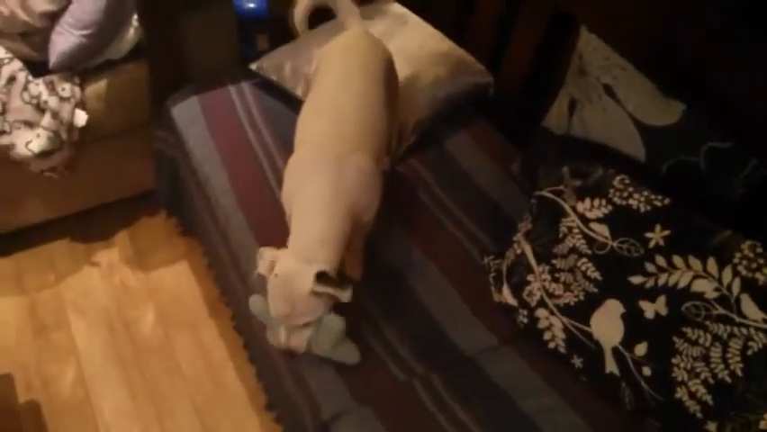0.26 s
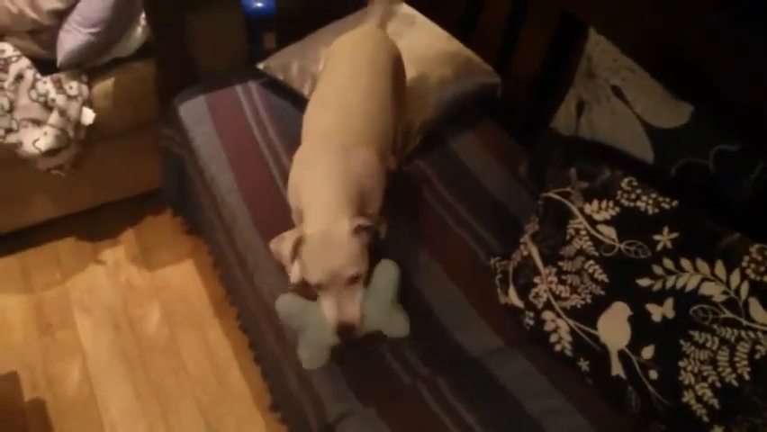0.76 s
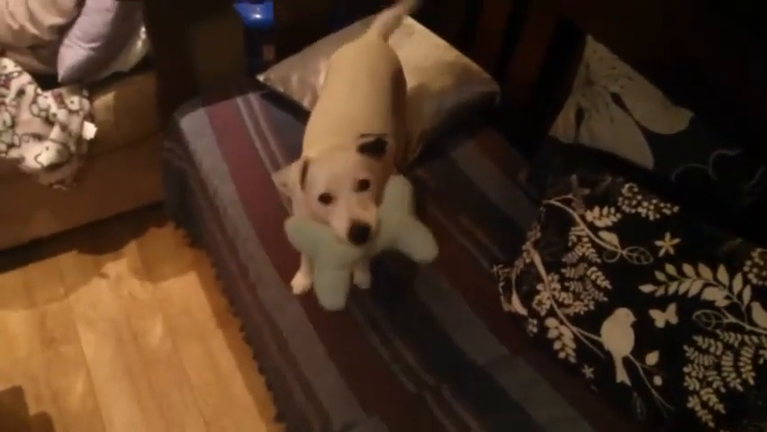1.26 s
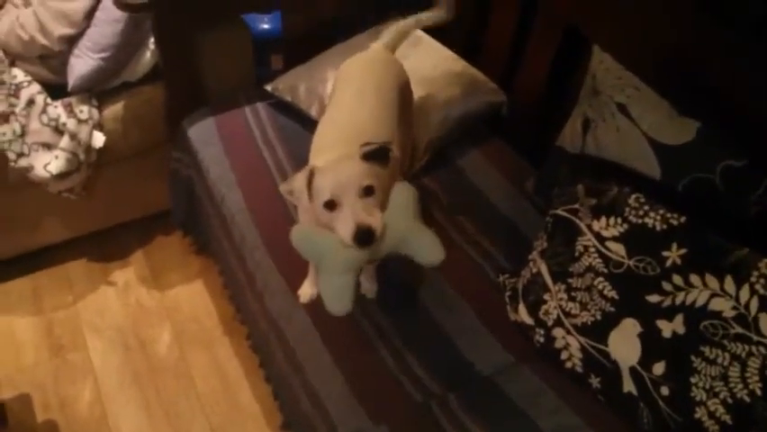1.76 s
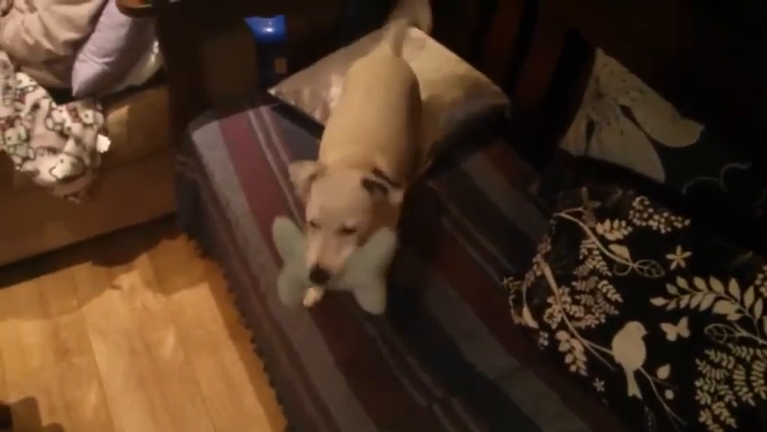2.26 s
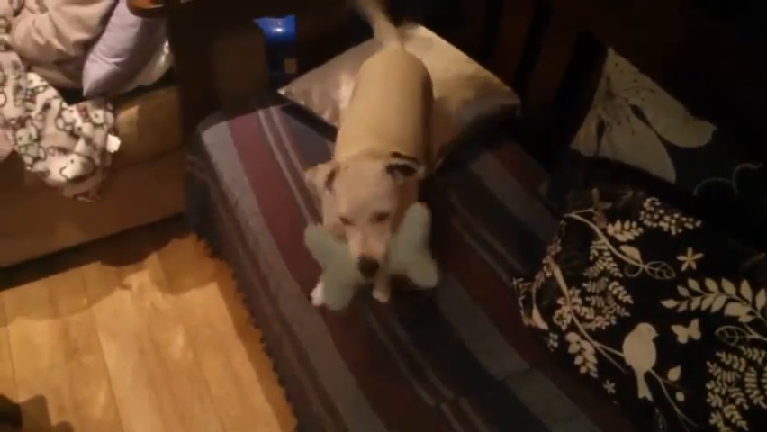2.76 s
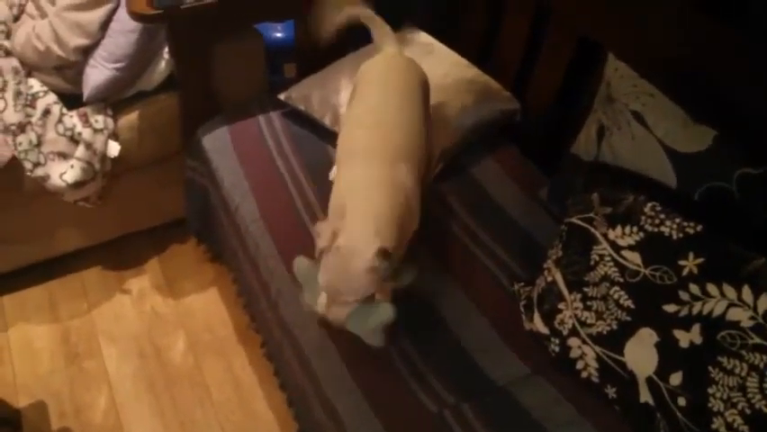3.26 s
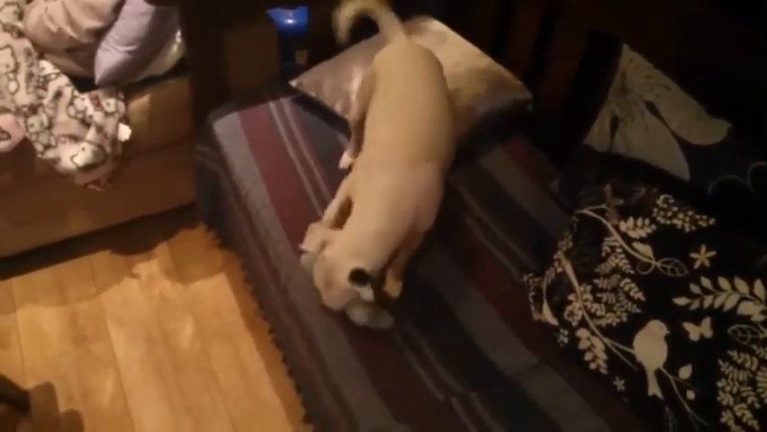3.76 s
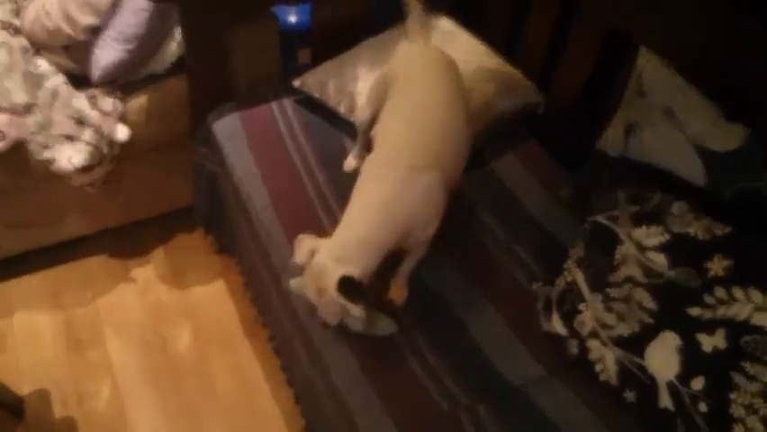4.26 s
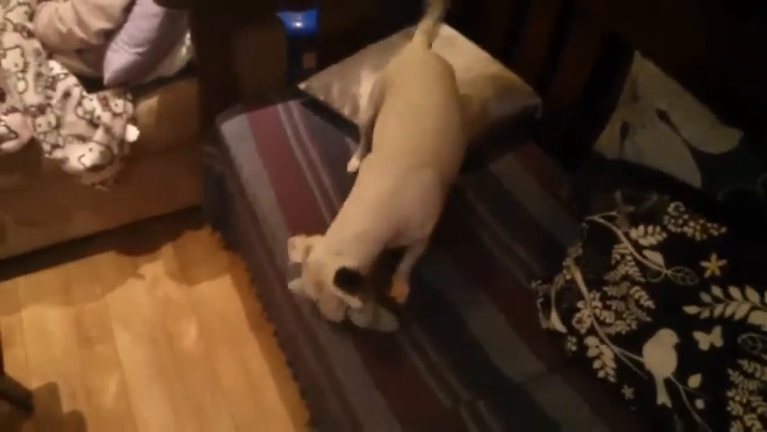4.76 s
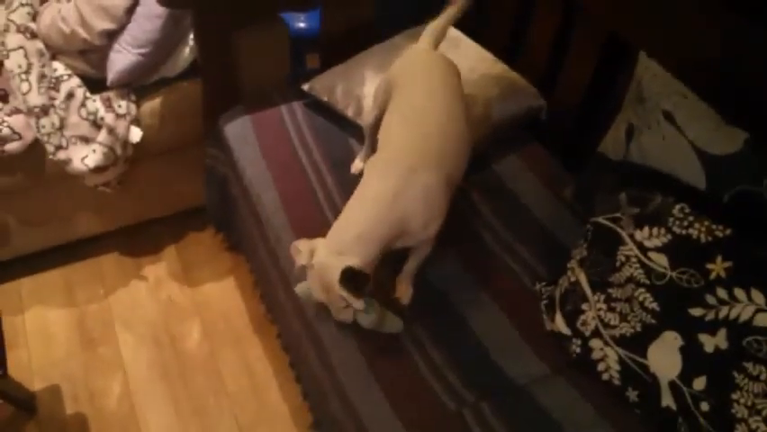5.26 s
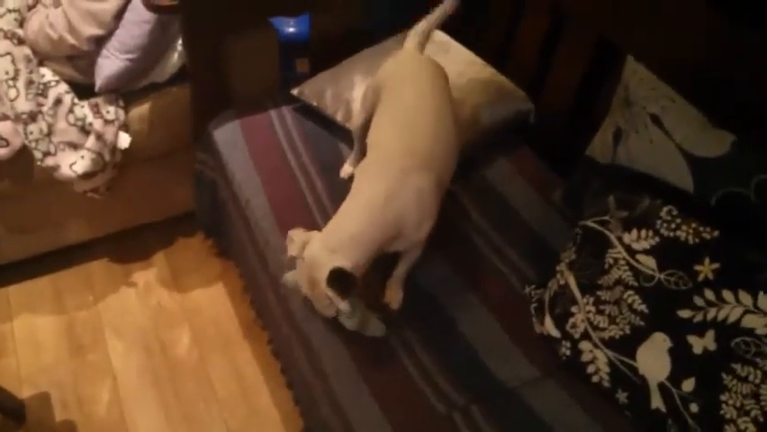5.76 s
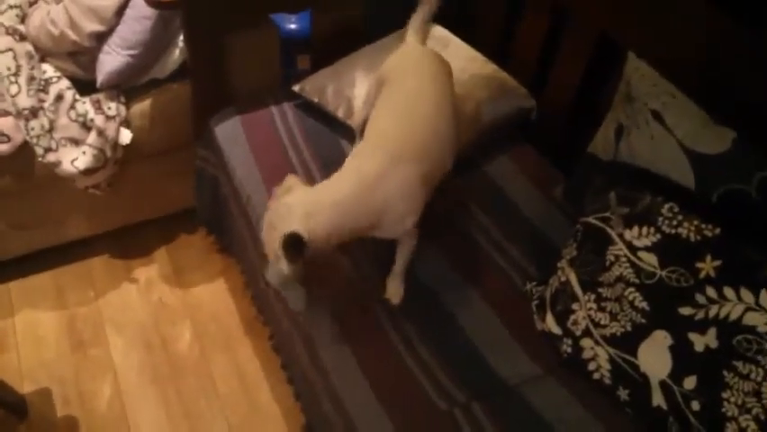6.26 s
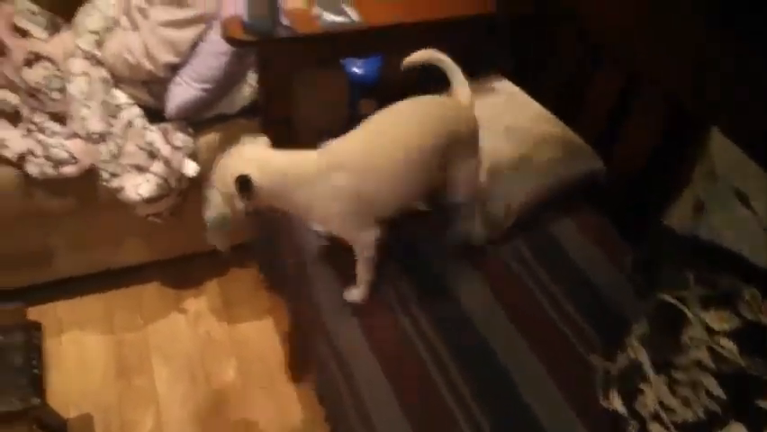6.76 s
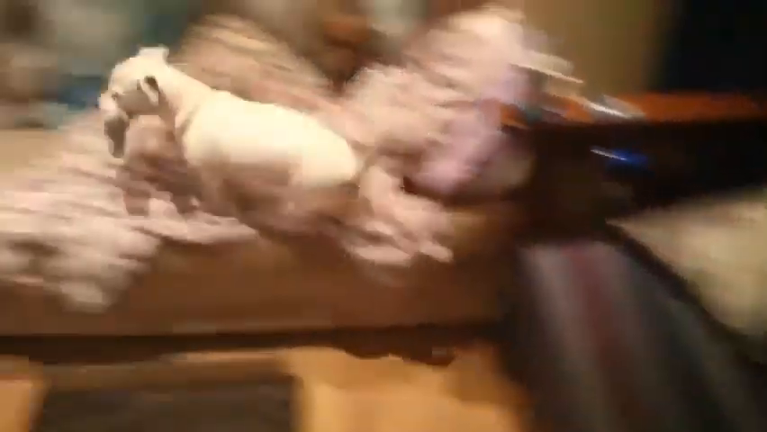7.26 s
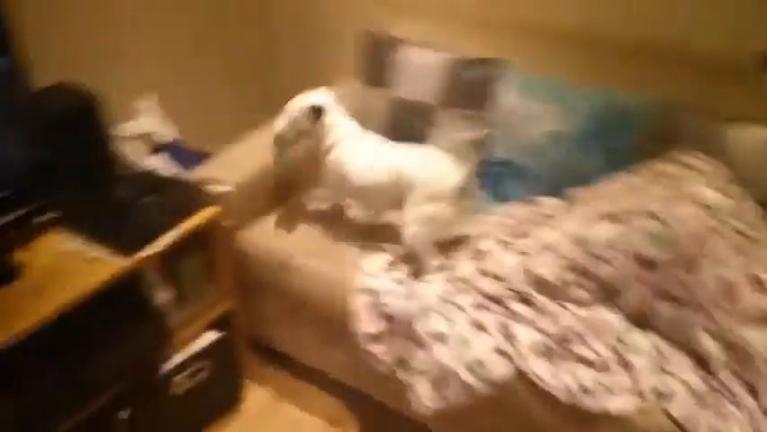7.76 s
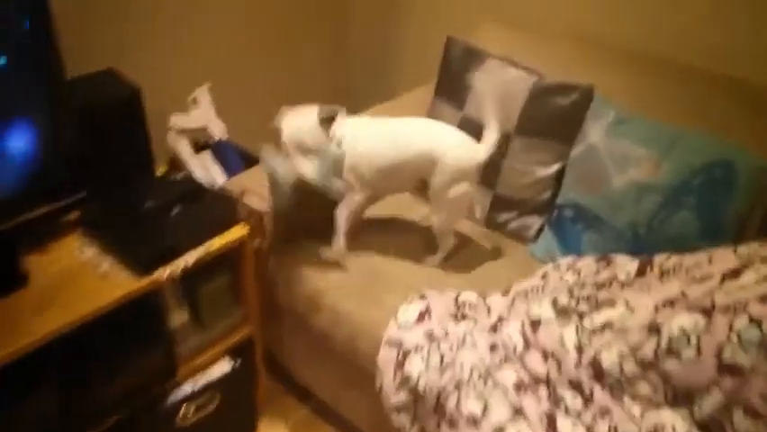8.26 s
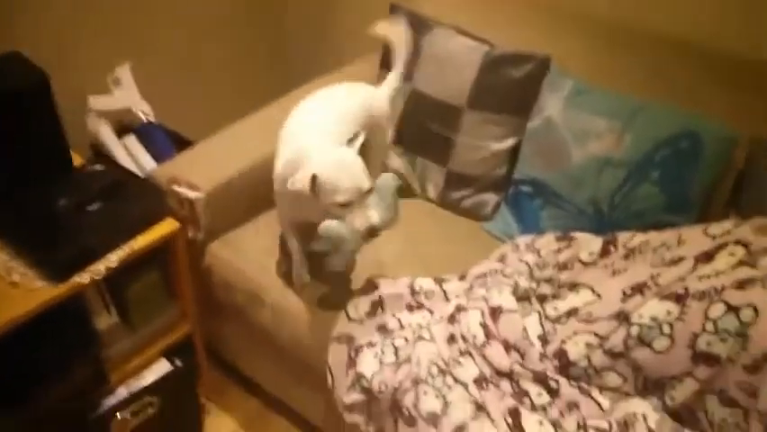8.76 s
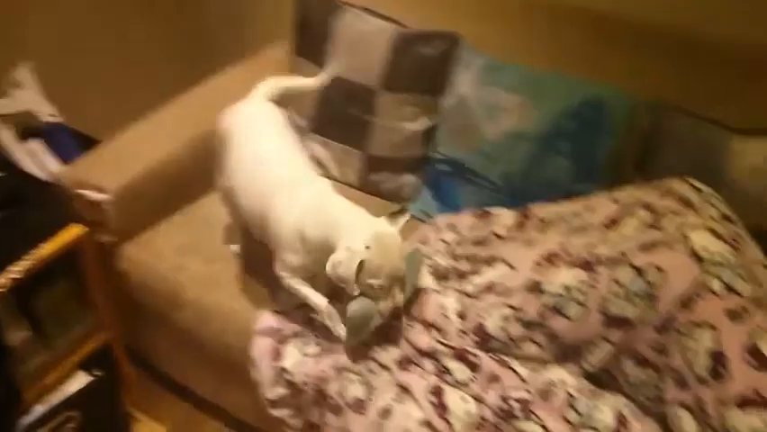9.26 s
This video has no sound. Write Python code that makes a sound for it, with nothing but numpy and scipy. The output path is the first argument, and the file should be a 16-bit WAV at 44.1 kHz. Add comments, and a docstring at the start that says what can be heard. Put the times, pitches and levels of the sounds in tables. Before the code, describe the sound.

Brief squeaks and sharp, rattly snaps from a dog's chew toy, with close thumps and then soft paw steps on a sofa.

```python
"""Dog with a squeaky toy

In a furnished room a dog chews a toy, then jumps to a sofa and pads about on it. Air pressed out and
sucked back swings the toy's reed into squeaks; a hard bite cracks it into a rattle. Teeth and claws
tick, cloth rustles. Right at the microphone, fingers bump the handheld camera over a faint hiss."""
import sys
import numpy as np
from scipy import signal
from scipy.io import wavfile
from scipy.ndimage import uniform_filter1d

SR = 44100
rng = np.random.default_rng(int(sys.argv[2]) if len(sys.argv) > 2 else 0)


def to_wav(sig):
    """Store sig (one row per channel, or 1-D mono) as 16-bit WAV at the path in sys.argv[1].

    Samples outside -1..1 are clipped; the rate is SR.
    """
    pcm = np.clip(np.atleast_2d(sig), -1, 1) * 32767
    pcm = np.round(pcm).astype(np.int16)
    wavfile.write(sys.argv[1], SR, pcm.T)  # frames by channels


N = 418950


def gain_of(db):
    return 10 ** (np.asarray(db) / 20)


def unit_rms(x):
    return x / np.sqrt(np.mean(x ** 2) + 1e-20)


def curve_at(points, hz):
    f, value = np.transpose(points)
    return np.interp(np.log(hz + 1), np.log(f + 1), value)


def add(mix, start_s, sound):
    part = mix[round(start_s * SR):][:len(sound)]
    part += sound[:len(part)]


def drift(shape, samples, passes=1):
    """Random motion, smoothed over so many samples."""
    x = rng.standard_normal(shape)
    for _ in range(passes):
        x = uniform_filter1d(x, samples)
    return unit_rms(x)


def noise(spectrum, patchy_db):
    """Coloured noise whose bands swell and fade in random patches."""
    real, imag, patches = rng.standard_normal((N // 256 + 5, 513, 3)).T
    patches = unit_rms(uniform_filter1d(uniform_filter1d(patches, 9, axis=0), 9, axis=1))
    colour_db = curve_at(spectrum, np.fft.rfftfreq(1024, 1 / SR))[:, None]
    spectra = (real + 1j * imag) * gain_of(colour_db + patchy_db * patches)
    return unit_rms(signal.istft(spectra, nperseg=1024, noverlap=768)[1][:N])


def fader(rows):
    """Gain along (time_s, level_db) points, silent outside them."""
    s, db = np.transpose(rows)
    return gain_of(np.interp(np.arange(N) / SR, s, db, -120, -120))


# Decay of the furnished room: freq_hz, t60_s
ROOM_DECAY = [(300, 0.27), (800, 0.2), (1400, 0.26), (2000, 0.31), (3000, 0.23), (5500, .26), (9000, 0.24),
              (13000, 0.27)]
def room(x):
    """Sparse echoes, each band dying at its own speed, and a faint slower tail from the next room."""
    taps = np.zeros(SR // 2)
    slots = np.arange(80, len(taps) - 12, 12)
    taps[slots + rng.integers(0, 12, len(slots))] = rng.choice([-1., 1.], len(slots))
    hz, t, spectra = signal.stft(taps, SR, nperseg=256)
    fall_db = -60 * t / curve_at(ROOM_DECAY, hz)[:, None]
    tail = signal.istft(spectra * (gain_of(fall_db) + gain_of(.5 * fall_db - 25)), SR, nperseg=256)[1]
    return signal.fftconvolve(x, tail / np.linalg.norm(tail))[:N]


# Noise floor at the microphone: freq_hz, density_db
HISS_SPECTRUM = [(12, -49), (25, -7.5), (86, -6), (155, -19), (230, -7.5), (320, -13.5), (460, -33.5),
                 (620, -29), (900, -30.5), (2000, -32.5), (3300, -38.5), (5200, -31), (8500, -35.5),
                 (12000, -30.5), (15000, -23), (16400, -44.5)]
def hiss():
    """A faint, steady bed of noise, strongest in the bass."""
    return gain_of(-70.5) * noise(HISS_SPECTRUM, patchy_db=2.3)


# Colour of the close rumble: freq_hz, density_db
RUMBLE_SPECTRUM = [(15, -31), (25, -10.5), (59, 3.5), (124, 4), (283, -1), (379, -21), (584, -28.5),
                   (700, -29.5), (910, -63.5), (1540, -120)]
# Its swells: time_s, level_db
RUMBLE_LEVELS = [(0.0, -75), (0.79, -61), (0.98, -74.5), (1.58, -63.5), (2.04, -72.5), (4.15, -67.5),
                 (5.16, -75), (5.48, -67.5), (5.98, -74.5), (6.38, -63.5), (6.54, -53.5), (7.06, -49),
                 (7.43, -61), (7.83, -43.5), (8.17, -65.5), (8.36, -55), (8.52, -56), (8.73, -53.5),
                 (8.97, -61.5), (9.5, -70)]
def rumble():
    """The low stir of hands and cushions."""
    return noise(RUMBLE_SPECTRUM, patchy_db=4) * fader(RUMBLE_LEVELS)


# Fingers on the camera, right at the microphone: start_s, level_db, pitch_scale_hz, t60_s
CAMERA_BUMPS = [(1.272, -25.5, 174, 0.065), (1.553, -33.5, 302, 0.051), (1.686, -49, 248, 0.13),
                (1.728, -44.5, 243.5, 0.075), (2.301, -54.5, 129, 0.29), (2.329, -48, 146.6, 0.7),
                (2.436, -44.5, 304, 0.075), (3.677, -48.5, 238, 0.2), (5.422, -46, 250.4, 0.08),
                (5.477, -14, 337, 0.062), (6.426, -35, 252.3, 0.14), (6.4499, -14.5, 363, 0.064),
                (6.482, -17, 336, 0.055), (6.559, -39, 251, 0.14), (6.585, -11.5, 303, 0.037),
                (6.789, -55, 248, 0.045), (7.016, -21.5, 330, 0.075), (7.296, -38, 238, 0.19),
                (7.722, -40, 196, 0.33), (8.721, -42, 199, 0.11), (8.807, -40, 201, 0.084)]
def camera_bumps():
    """The case swings fast, then slower as it settles; a panel rings, damped by the hand."""
    out, t = np.zeros(N), np.arange(9000) / SR
    for s, db, scale_hz, t60 in CAMERA_BUMPS:
        age = t * scale_hz
        turns = np.cumsum(scale_hz * (.28 + .58 * np.exp(-(age / 1.7) ** 2))) / SR
        swing = np.sin(2 * np.pi * turns - 1.2) * (1 - np.exp(-(age / .59) ** 3))
        panel = np.sin(2 * np.pi * rng.uniform(550, 900) * t) * age * np.exp(-t / .003)
        envelope = gain_of(db + 5 - 60 * t / t60) * (.69 + .26 * np.exp(-(age / 4.8) ** 2))
        add(out, s, envelope * (swing + .082 * panel))
    return out


# Colour of the rustle: freq_hz, density_db
RUSTLE_SPECTRUM = [(350, -31), (650, -2.5), (1000, -7.5), (1400, -17), (2000, -6), (2800, -14.5),
                   (3800, -8), (4800, -4), (6000, -13), (7500, -27), (11000, -58)]
# Cloth under the jumping, turning dog, over on the sofa: time_s, level_db
SHUFFLE_LEVELS = [(6.3, -86), (6.78, -89.5), (7.0, -74), (7.2, -82), (7.45, -82.5), (7.7, -70),
                  (7.85, -75.5), (8.18, -76.5), (8.29, -78), (8.6, -81.5), (8.99, -75.5), (9.23, -80.5),
                  (9.45, -91.5)]
# A squeak's dying tail at the start, then drags of cloth: peak_s, level_db, rise_s, fall_s
NOISE_BURSTS = [(0.02, -62.5, .03, 0.0029), (3.724, -67.5, .012, 0.012), (6.397, -72, .004, .015),
                (6.694, -82, .02, 0.023), (6.842, -71.5, .015, 0.027), (6.925, -52, .006, 0.017),
                (7.118, -74.5, .03, .025), (7.265, -83.5, .006, 0.024), (7.32, -79.5, .006, 0.017),
                (7.56, -53.5, .02, 0.08), (8.42, -67, .05, 0.077), (8.732, -56.5, .05, 0.014)]
def rustle():
    """A slow shuffle of rubbed fabric, plus short noise bursts that swell and die."""
    t = np.arange(N) / SR
    bursts = sum(gain_of(db) * np.exp(-abs(t - s) / np.where(t < s, rise, fall))
                 for s, db, rise, fall in NOISE_BURSTS)
    return noise(RUSTLE_SPECTRUM, patchy_db=0) * (fader(SHUFFLE_LEVELS) + bursts)


# One soft whiff in the room: start_s, end_s, level_db, centre_hz, width_hz
AIR_LEAK = (2.24, 2.45, -75, 4300, 650)
def air_leak():
    """Air hisses through a narrow gap."""
    start, end, db, hz, width = AIR_LEAK
    band = [(hz - 2 * width, -40), (hz - width / 2, 0), (hz + width / 2, 0), (hz + 2 * width, -40)]
    swell = fader([(start, db - 16), ((start + end) / 2, db), (end, db - 2)])
    return noise(band, patchy_db=1.5) * swell


# Paws on the furniture: start_s, level_db, pitch_hz
PAW_STEPS = [(0.431, -51, 147), (0.742, -65, 213), (1.172, -50, 224), (7.631, -32, 481), (7.755, -27, 563),
             (8.317, -35.5, 154), (8.383, -29, 335), (8.639, -40.5, 145), (8.691, -22.5, 491),
             (8.867, -44, 595), (9.265, -62, 197.7)]
def paws():
    """Each step gives a cushioned knock and a dull scuff."""
    out, t = np.zeros(N), np.arange(6000) / SR
    for s, db, hz in PAW_STEPS:
        knock = np.sin(2 * np.pi * hz * t) * gain_of(-60 * t / .028)
        scuff = drift(len(t), 50, passes=2) * np.cos(2 * np.pi * 1.4 * hz * t) * gain_of(-60 * t / .063)
        add(out, s, gain_of(db) * (knock + .35 * scuff) * (1 - np.exp(-t / .001)))
    return out


# Teeth and claws, close-sounding: start_s, level_db, centre_hz, decay_s
TOOTH_AND_CLAW_TICKS = [(0.141, -55, 2040, 0.0048), (1.038, -50, 1910, 0.0027), (1.158, -49, 3440, 0.0021),
                        (1.554, -34, 966, 0.0017), (1.555, -54.5, 3140, 0.003), (4.146, -36, 5400, 0.0014),
                        (4.818, -41.5, 5130, 0.0037), (4.831, -34.5, 4800, 0.002),
                        (4.84, -48.5, 5130, 0.0033), (4.86, -50, 5090, .003), (4.862, -64, 4950, 0.0036),
                        (5.473, -54.5, 1844, 0.0028), (5.625, -72.5, 7960, 0.0019),
                        (6.39, -58, 4330, 0.011), (6.422, -51, 1810, 0.0018), (6.446, -50.5, 1330, 0.005),
                        (6.58, -60, 870, 0.0084), (6.91, -43.5, 2014, 0.0044), (7.014, -48, 1830, 0.0031),
                        (7.315, -60, 2170, 0.0056), (8.387, -46, 3610, 0.0055), (9.344, -50, 2760, 0.001)]
def teeth_and_claws():
    """Each hard contact ticks: a grain of noise around a centre pitch."""
    out, t = np.zeros(N), np.arange(1500) / SR
    for s, db, hz, decay_s in TOOTH_AND_CLAW_TICKS:
        grit = drift(len(t), 22) * np.cos(2 * np.pi * hz * t)
        add(out, s, gain_of(db) * grit * (1 - np.exp(-t / .0053)) * np.exp(-t / decay_s))
    return out


def reed(length_s, pressure_db, pitch_hz, treble_db, fundamental_db, *,
         tone, rise_share, fade_db, scoop, sag, waver, air, air_samples):
    """The reed swings once a cycle; its pitch slides in as pressure builds and sags as it leaks away."""
    t = np.arange(0, length_s, 1 / SR)
    slack_db = -11.5 * np.maximum(1 - t / (rise_share * length_s), 0) + fade_db * (t / length_s) ** 1.8
    tilt_db = treble_db + .73 * slack_db  # less pressure, duller tone
    slide_in = scoop * np.exp(-t / .0074)
    droop = sag * np.exp(-((t - length_s) / (.32 * length_s)) ** 2)
    hz = pitch_hz * (1 - slide_in - droop) * (1 + waver * drift(len(t), 90))
    hz *= 1 + .016 * drift(len(t), 250, passes=2)  # the jaw trembles
    k = np.arange(1, 16)[:, None]
    heights = gain_of(curve_at(tone, k * hz) + tilt_db * np.log2(k * hz / 3000) + fundamental_db * (k == 1))
    turns = k * np.cumsum(hz) / SR + rng.random(k.shape)
    smear = air * np.minimum(k / 2, 1) * drift(heights.shape, air_samples, passes=2)  # leaking air
    harmonics = heights * (1 + smear) * np.cos(2 * np.pi * turns)
    squeak = harmonics.sum(0) / np.sqrt((heights ** 2).sum(0) / 2)
    return gain_of(pressure_db + slack_db) * squeak * signal.windows.tukey(len(t), .25)


# Overtones of the reed on the inflow: freq_hz, level_db
REFILL_TONE = [(1000, -10), (2100, -3.5), (3200, -12), (4300, -9), (5300, -9.5), (6500, -23.5), (8000, -15),
               (9000, -4), (10000, 3.5), (11000, -11.5), (12500, -21), (16000, -33)]
# The toy refills: start_s, length_s, pressure_db, pitch_hz, treble_db_per_octave, fundamental_db,
# rasp_share
TOY_REFILLS = [(0.03, 0.027, -40, 1079, 3, 5, .5), (0.617, 0.035, -35.5, 1092, 3.5, 9, 0.11),
               (1.043, 0.028, -41, 1074, 2, 5, 0.7), (2.875, 0.029, -43, 1040, 2, 5.5, 0.53),
               (3.228, 0.022, -42.5, 1032, 1, 3, 0.64), (3.581, .026, -50.5, 988, -2, -1.5, 0.64),
               (4.163, 0.026, -40, 1094, 2.5, 13.5, 0.52), (4.475, 0.041, -37.5, 1062, 3, 13.5, 0.04),
               (5.535, 0.031, -55, 897, -6.5, 3.5, 0.75), (6.28, .022, -48, 991, 1, 4, 0.77),
               (7.382, .02, -72, 995, -9, -8, 0), (7.77, 0.029, -43, 1062, 2.5, 4.5, 0.8),
               (8.336, 0.023, -47, 967, -1.5, 1, 0.58), (8.783, 0.024, -38, 1078, 1.5, 7.5, 0.52),
               (9.428, 0.017, -46, 1005, -1, 3.5, .4)]
def refills():
    """Air sucked back past the reed gives a lower, raspier squeak."""
    out = np.zeros(N)
    for s, *breath, rasp in TOY_REFILLS:
        add(out, s, reed(*breath, tone=REFILL_TONE, rise_share=.41, fade_db=-4.5, scoop=-.03, sag=.06,
                         waver=.005 + .035 * rasp, air=.15 + .75 * rasp, air_samples=60))
    return out


# Overtones of the reed on the outflow: freq_hz, level_db
SQUEEZE_TONE = [(1300, 2.5), (2700, 2.5), (4000, 0.5), (5400, 3.5), (6700, -4), (8000, 0.5), (9500, 6),
                (11000, -5), (13000, -23.5), (16000, -35.5)]
# The jaw closes: start_s, length_s, pressure_db, pitch_hz, treble_db_per_octave, fundamental_db,
# sag_share, fade_db
TOY_SQUEEZES = [(0.803, 0.035, -37, 1302, 5, 5, .05, -12), (1.203, 0.041, -32.5, 1346, 5, 4, 0.055, -9.5),
                (2.986, .082, -29.5, 1367, 3.5, -1.5, .04, -3),
                (3.381, 0.05, -33.5, 1351, 3, 2, 0.031, -6.5),
                (5.047, .072, -33, 1414, 7, 11.5, 0.19, -13.5)]
def squeezes():
    """Air pressed out past the reed gives a bright squeak."""
    out = np.zeros(N)
    for s, *breath, sag, fade_db in TOY_SQUEEZES:
        add(out, s, reed(*breath, tone=SQUEEZE_TONE, rise_share=.27, fade_db=fade_db, scoop=.09, sag=sag,
                         waver=.008, air=.32, air_samples=75))
    return out


# Colour of the toy's rattle: freq_hz, density_db
RATTLE_SPECTRUM = [(88, -58), (150, -5.5), (494, -4.5), (649, 4.5), (790, -3.5), (1060, 5.5), (1790, 4),
                   (2500, -9.5), (2980, -4), (3500, -7), (4600, -5), (5500, -7.5), (6700, -11.5),
                   (7600, -9.5), (9100, -7), (11300, -15), (16000, -45)]
# Hard bites, out in the room: start_s, level_db, pitch_hz, length_s, treble_db_per_octave, air_ratio,
# cavity_db
HARD_BITES = [(0.276, -21, 1099, 0.017, 4.5, 0.39, 3.5), (0.874, -25, 1363, 0.0094, 4, 2.33, -3),
              (1.282, -21, 1326, 0.0059, 5, 2.18, 0.5), (2.453, -22.5, 1423, 0.015, 4, 0.8, -2.5),
              (3.07, -24.5, 1240, 0.013, 5.5, 2.13, 1.5), (3.422, -26.5, 1273, 0.015, 4.5, 2, -3),
              (3.88, -22.5, 1363, 0.017, 2.5, 0.74, -5.5), (6.055, -26, 1144, 0.017, -2, 0.56, -1),
              (7.512, -24.5, 1201, 0.014, 4.5, 1.1, -0.5), (8.074, -21, 1229, 0.019, 3, 0.64, -12),
              (8.569, -20.5, 998.5, 0.016, 4, 1.14, -6.5), (9.006, -20.5, 994.5, 0.014, 3, 0.92, -5)]
def cracks():
    """A sharp snap with a faint, brief lead-in; then the reed slaps unevenly amid rushing air."""
    out, t = np.zeros(N), np.arange(4096) / SR
    f = abs(np.fft.fftfreq(len(t), 1 / SR))
    snap_t = np.arange(-200, 200) / SR
    lead_in = .042 * (snap_t < 0) * (1 + snap_t / snap_t[-1])
    snap = .8 * np.cos(2 * np.pi * 1100 * snap_t) * (np.exp(-abs(snap_t) / .00055) + lead_in)
    for s, db, hz, length_s, tilt_db, air, cavity_db in HARD_BITES:
        wobble, strength, rush = rng.standard_normal((3, len(t)))
        turns = np.cumsum(hz * (1 + .13 * unit_rms(uniform_filter1d(wobble, 60)))) / SR
        slaps = np.diff(np.floor(turns), prepend=0) * (1 + .69 * strength) * np.sqrt(SR / hz)
        drive = (slaps + 2 * air * rush) * (1 - np.exp(-t / .001)) / (1 + (t / length_s) ** 3)
        colour_db = curve_at(RATTLE_SPECTRUM, f) + tilt_db * np.log2((f + 200) / 3000)
        colour_db += cavity_db / (1 + ((f - hz) / 250) ** 2)
        log_gain = np.log(gain_of(np.maximum(colour_db, -70)))
        body = np.fft.ifft(np.exp(np.conj(signal.hilbert(log_gain)))).real[:1024]  # minimum phase
        rattle = .2 * signal.fftconvolve(drive, body / np.linalg.norm(body))
        crack = np.append(np.zeros(200), rattle)  # the rattle starts at the peak of the snap
        add(crack, 0, snap)
        add(out, s - 165 / SR, gain_of(db) * crack)
    return out


def scene():
    """One microphone: the dog with the room around it, the handling close and dry."""
    ticks = teeth_and_claws()
    dog = ticks + squeezes() + refills() + cracks() + paws() + rustle() + air_leak()
    turn = 2.3 * np.arange(N) / SR  # the dog keeps moving, so three echo patterns take turns
    echoes = sum(room(dog * np.cos(turn + k * np.pi / 3)) for k in range(3)) * np.sqrt(2 / 3)
    close = ticks + camera_bumps() + rumble() + hiss()
    return (gain_of(2.5) * dog + gain_of(.5) * echoes + close)[None]


def record(dry, low_cut_hz=60, high_cut_hz=16000):
    """The camera's microphone drops deep bass; a steep band limit trims the top."""
    thin = signal.lfilter(*signal.butter(2, low_cut_hz, "high", fs=SR), dry)
    band_limit = signal.firwin(401, high_cut_hz, window=("kaiser", 9), fs=SR)
    return signal.oaconvolve(thin, band_limit[None], "same")


dry = scene()
out = record(dry)
to_wav(out)
```